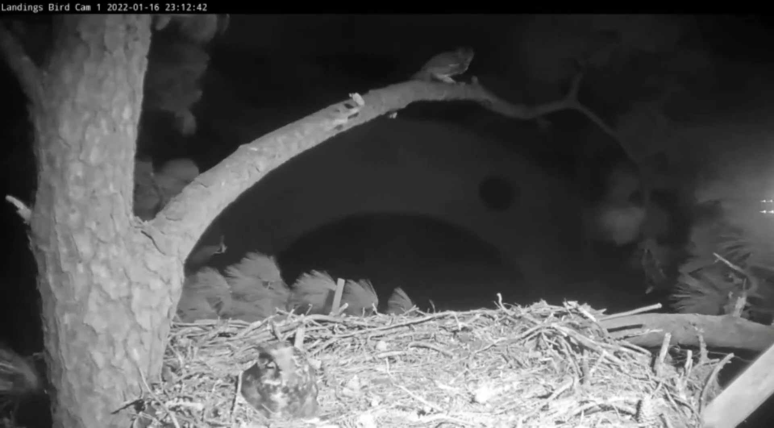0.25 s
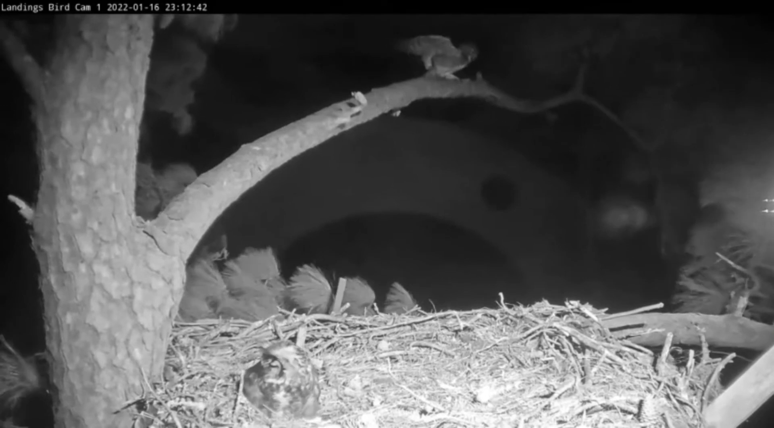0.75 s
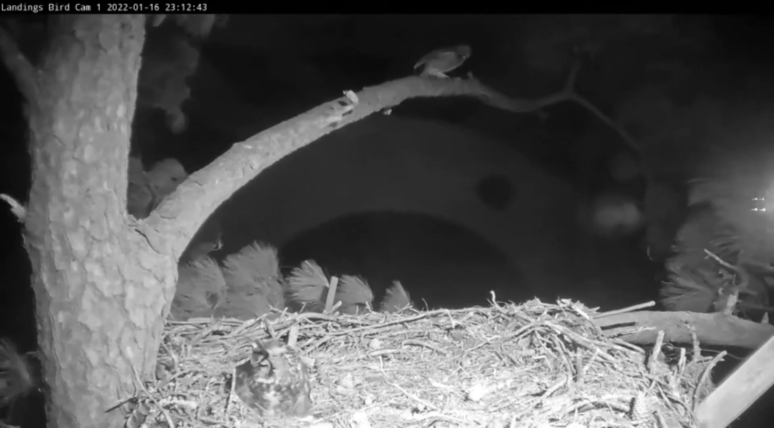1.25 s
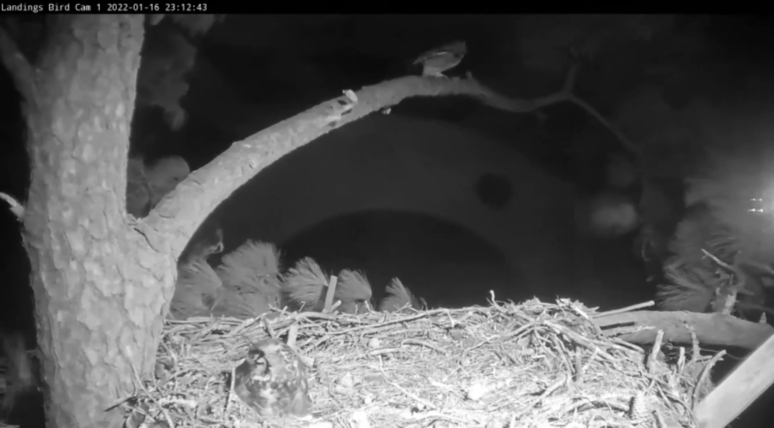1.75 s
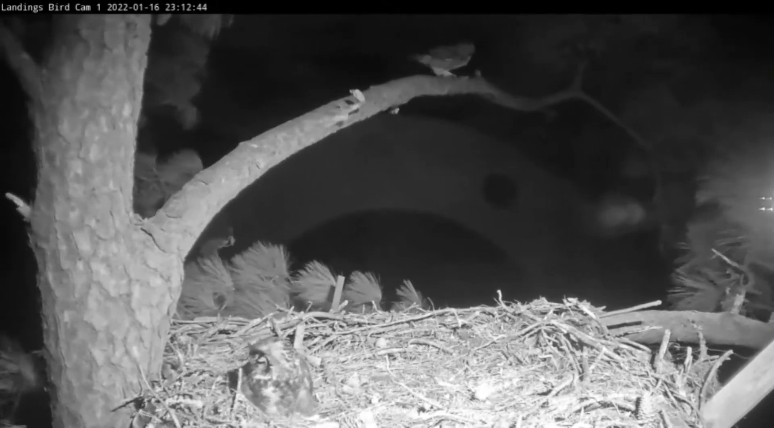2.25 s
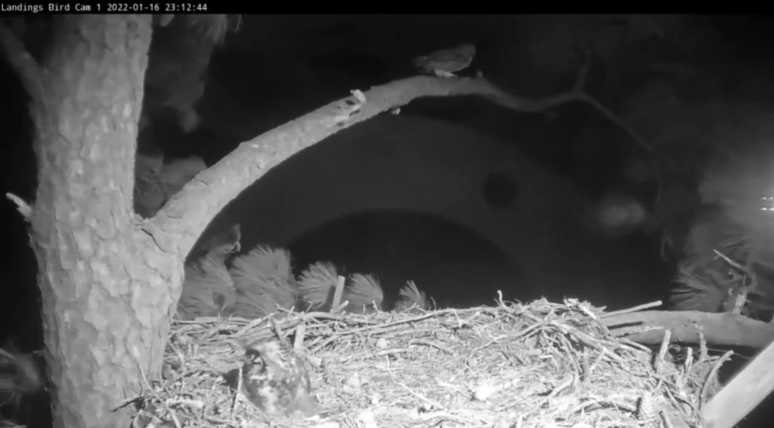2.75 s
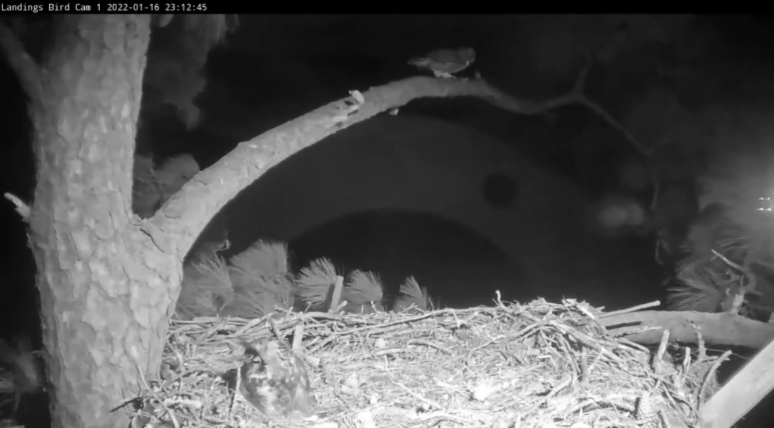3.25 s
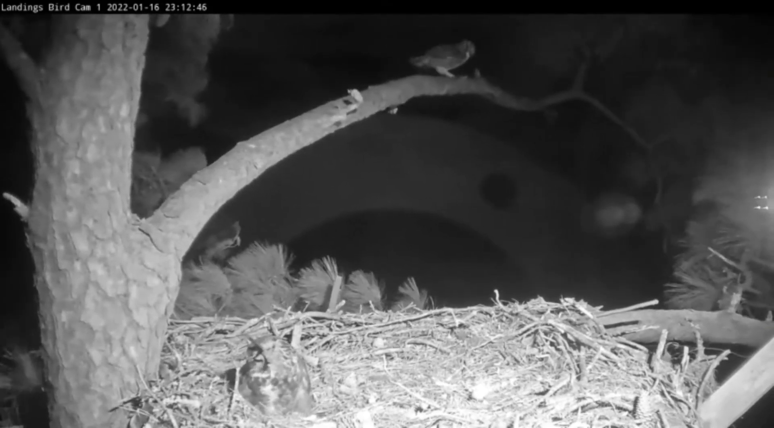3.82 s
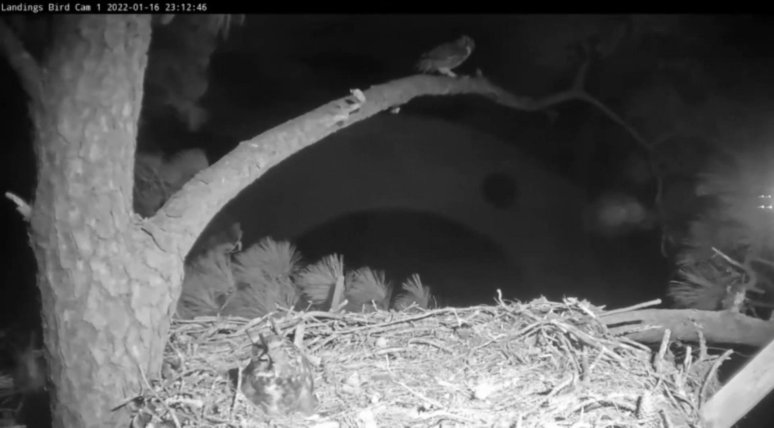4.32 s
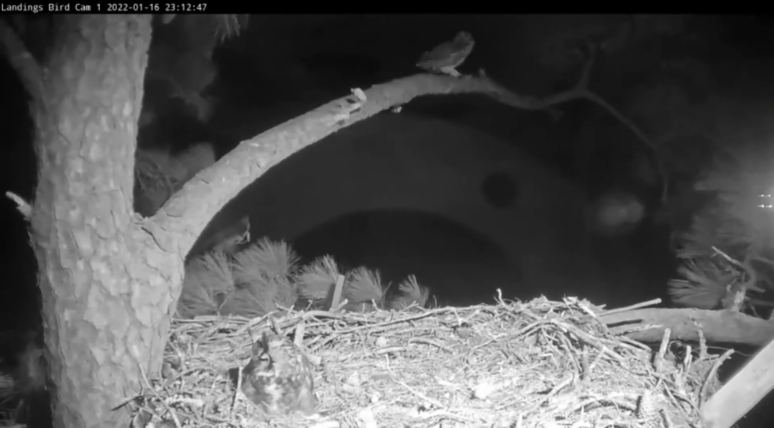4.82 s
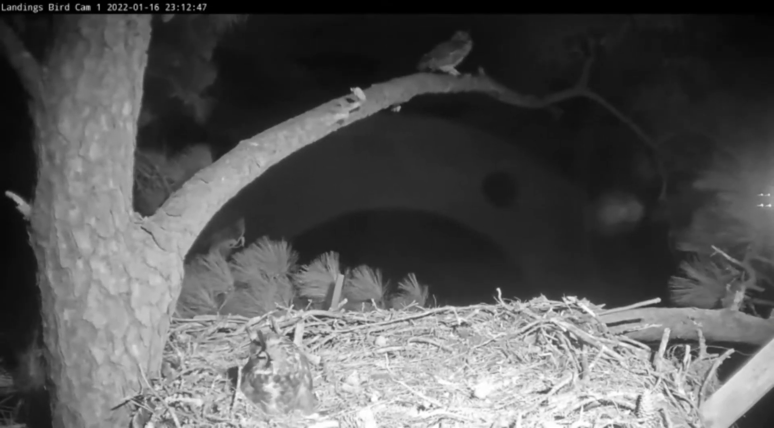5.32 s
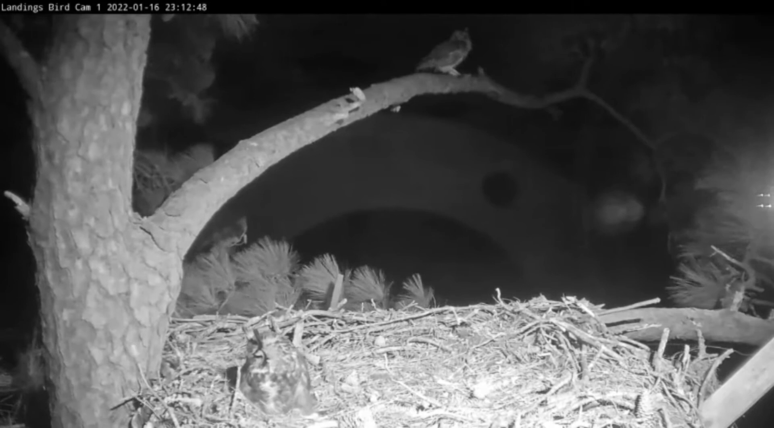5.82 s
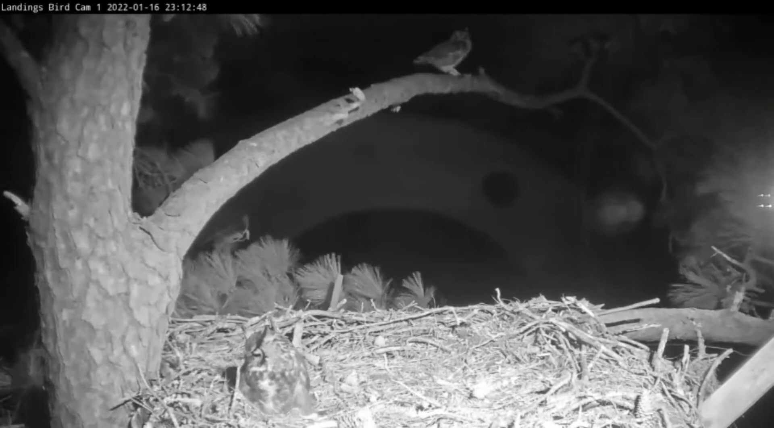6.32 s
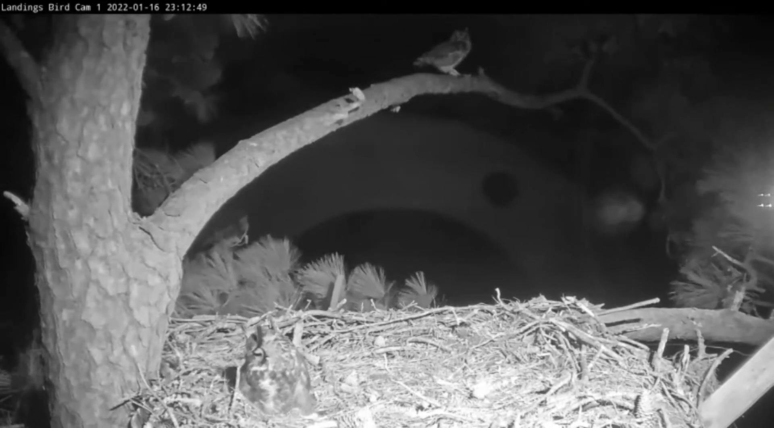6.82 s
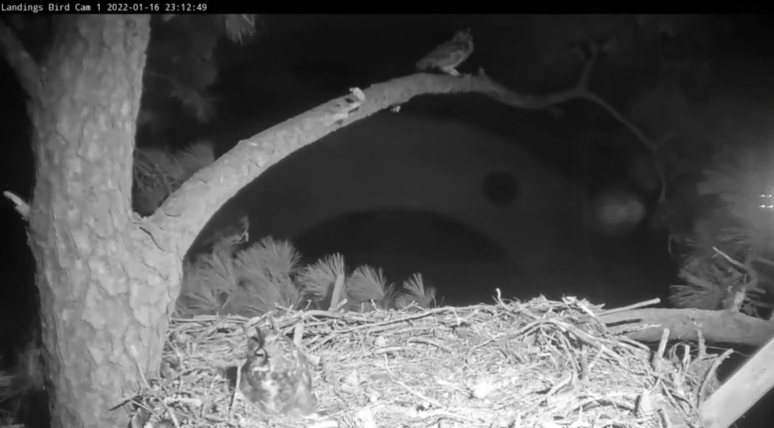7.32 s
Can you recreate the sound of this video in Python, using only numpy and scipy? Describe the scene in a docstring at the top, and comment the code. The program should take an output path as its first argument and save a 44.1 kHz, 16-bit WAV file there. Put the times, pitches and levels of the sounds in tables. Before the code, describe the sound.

Outdoors at night by a large nest in a pine, wind presses on a small housed microphone. Deep rumble and soft flutter rise and fall in uneven lumps over a hissing rush of needles and a hollow roar. The rush dips suddenly with many lumps, then creeps back. Tiny puffs, a thin steady whine and a weak mains hum lie beneath. The rumble eases near six and a half seconds. No bird is heard.

```python
"""Low rumble and flutter of wind on a small housed microphone, over air rushing through pine needles.
The rumbles are shaped noise with limited swings; the rush is hiss plus a roar coloured by the cavity.
Most lumps of wind make the rush fall at once and creep back, while the flutter swells and slackens.
A thin whine and a weak mains hum are sine tones over faint amplifier noise.
Brief random flecks of noise dot the wind, a few clear puffs among them."""
import sys
import numpy as np
from scipy import signal
from scipy.fft import rfft, irfft, next_fast_len
from scipy.io import wavfile
from scipy.ndimage import uniform_filter1d, map_coordinates

SR = 44100
rng = np.random.default_rng(int(sys.argv[2]) if len(sys.argv) > 2 else 0)


def output_pcm(signal):
    """Save a mono or channel-first signal as 16-bit PCM at the path in sys.argv[1].

    Samples are clipped to [-1, 1] before scaling.
    """
    pcm = np.clip(np.atleast_2d(signal).T, -1, 1) * 32767
    wavfile.write(sys.argv[1], SR, np.round(pcm).astype(np.int16))


N = 333837  # length [samples]


def amp(db):
    """Gain of a level in dB."""
    return 10 ** (np.asarray(db) / 20)


def unit(x):
    """x at rms 1."""
    return x / np.sqrt(np.mean(x ** 2) + 1e-20)


def curves(rows):
    """One value per sample for each column after the time."""
    times, *columns = np.transpose(rows)
    return [np.interp(np.arange(N) / SR, times, column) for column in columns]


def wobble(rate):
    """A smooth random curve, rate knots a second."""
    knots = rng.standard_normal(int(N * rate / SR) + 4)
    return map_coordinates(knots, [np.arange(N) * rate / SR])


def filtered(x, response):
    """x times a response of frequency."""
    m = next_fast_len(N + 8192)
    spectrum = rfft(x, m) * response(np.fft.rfftfreq(m, 1 / SR))
    return irfft(spectrum, m)[..., :N]


def shaped_noise(spectrum, patchy_db):
    """Noise of rms 1 with this spectrum and random patches of gain in time and frequency."""
    cells = signal.stft(rng.standard_normal(N), nperseg=512)[2]
    patches = uniform_filter1d(rng.standard_normal(cells.shape), size=6, axis=0)
    patches = uniform_filter1d(patches, size=8, axis=1)
    noise = signal.istft(cells * amp(patchy_db * unit(patches)), nperseg=512)[1][:N]
    table_hz, table_db = np.transpose(spectrum)
    log_hz = np.log(table_hz + 1)
    return unit(filtered(noise, lambda hz: amp(np.interp(np.log(hz + 1), log_hz, table_db))))


def even_swings(push):
    """The diaphragm's travel is limited, so its swings are even in size."""
    return unit(push / (1 + (push / 3.2) ** 2) ** .5)


# Wind on the microphone: (time [s], deep rumble level [dB], upper rumble level [dB])
BUFFET = [(0, -31.5, -39), (.1, -33, -42), (.44, -43, -36.5), (1.05, -42.5, -36.5), (1.16, -34.5, -40),
          (1.72, -38, -38), (1.85, -31, -36.5), (2.02, -37.5, -42), (2.55, -37, -40), (2.78, -41.5, -40.5),
          (3.12, -37.5, -34), (3.39, -32.5, -35.5), (3.54, -36.5, -42.5), (3.69, -43.5, -40.5),
          (4.17, -36, -33), (4.32, -39.5, -37), (4.83, -42, -31.5), (4.98, -33.5, -34), (5.2, -41, -37.5),
          (5.44, -36.5, -38), (5.9, -36, -38.5), (5.97, -42.5, -46), (6.4, -51.5, -42), (6.89, -48, -44.5),
          (7.23, -38, -39), (7.57, -37.5, -36.5)]
# Spectrum of the slow eddies: (frequency [Hz], relative density [dB per Hz])
DEEP_SPECTRUM = [(20, -37.5), (33, -27.5), (45, -11), (57, -3.5), (80, 3), (105, -0.5), (130, -19.5),
                 (240, -120)]
# Spectrum of the quicker eddies: (frequency [Hz], relative density [dB per Hz])
RUMBLE_SPECTRUM = [(56, -33.5), (95, 1), (129, 4), (194, -8), (230, -16.5), (300, -43), (510, -120)]
# Spectrum of the flutter: (frequency [Hz], relative density [dB per Hz])
FLUTTER_SPECTRUM = [(110, -31), (190, -5), (270, 0), (330, -7), (450, -13.5), (700, -22), (1650, -120)]
LUMPY_DB = 0.23  # scale of the rumble's random swings
USUAL_DB = -37  # usual upper rumble
FLUTTER_DB = -45.5  # level before fall, swell and wind strength are added
FLUTTER_FALLS = 0.53  # dB for each dB that the rush is down
FLUTTER_FOLLOWS = 0.25  # dB for each dB that the upper rumble is over its usual level


def buffet(eddies, fall_db, swell_db):
    """Eddies push the diaphragm: slow ones rumble deep, quicker ones rumble higher and flutter."""
    deep_db, rumble_db = curves(BUFFET)
    deep = amp(LUMPY_DB * wobble(8)) * even_swings(shaped_noise(DEEP_SPECTRUM, patchy_db=-1.6))
    rumble = amp(LUMPY_DB * wobble(8)) * even_swings(shaped_noise(RUMBLE_SPECTRUM, patchy_db=0.64))
    flicker = amp(1.2 * wobble(30) + 1.2 * eddies)
    flutter = unit(flicker * shaped_noise(FLUTTER_SPECTRUM, patchy_db=1.1))
    flutter_db = FLUTTER_DB - FLUTTER_FALLS * fall_db + swell_db
    flutter_db = flutter_db + FLUTTER_FOLLOWS * (rumble_db - USUAL_DB)
    return amp(deep_db) * unit(deep) + amp(rumble_db) * unit(rumble) + amp(flutter_db) * flutter


# Spectrum of the rush as heard, with a steep roll-off above 7 kHz:
# (frequency [Hz], relative density [dB per Hz])
HISS_SPECTRUM = [(680, -29.5), (1150, -1.5), (1300, -4), (2030, -6), (2230, -2), (2610, -5), (2900, -1),
                 (3180, -0.5), (4200, -7), (5280, -9.5), (6690, -19.5), (7070, -25), (7650, -42.5),
                 (8200, -45.5), (9500, -54), (16700, -76.5)]
# Spectrum coloured by the cavity of the housing: (frequency [Hz], relative density [dB per Hz])
ROAR_SPECTRUM = [(150, -51), (300, -17), (500, -13.5), (700, -11.5), (850, -6), (960, -2.5), (1040, 1.5),
                 (1090, -3.5), (1160, -12.5), (1300, -19), (2000, -19), (3000, -38.5), (5000, -120)]
RUSH_DB, ROAR_DB = -38, -40  # levels before fall and swell are added
ROAR_FALLS = 0.63  # dB for each dB that the rush is down
ROAR_SWELLS = 0.33  # dB for each dB that the flutter is up


def needles(eddies, fall_db, swell_db):
    """The rush flickers with the eddies and dulls when weak; the cavity roar falls less and follows the swell."""
    hiss_db = RUSH_DB - fall_db
    hiss = unit(amp(0.88 * eddies) * shaped_noise(HISS_SPECTRUM, patchy_db=0.25))
    bright = filtered(hiss, lambda hz: hz ** 2 / (hz ** 2 + 32000.0 ** 2))
    dull = np.clip((-52.0 - hiss_db) / 25, 0, .9)  # share of the bright part taken away
    roar = unit(amp(1.3 * eddies) * shaped_noise(ROAR_SPECTRUM, patchy_db=0.43))
    roar_db = ROAR_DB - ROAR_FALLS * fall_db + ROAR_SWELLS * swell_db
    return amp(hiss_db) * (hiss - dull * bright) + amp(roar_db) * roar


# Whine against the rush, before its random wobble: (time [s], level over the rush [dB])
WHINE = [(0, -17.5), (3.5, -15), (5.3, -14.5), (6.1, -11), (6.7, -13.5), (7.57, -19)]
# Spectrum of the amplifier noise: (frequency [Hz], relative density [dB per Hz])
AMPLIFIER_SPECTRUM = [(6000, -2), (10000, 1), (16000, 0)]
WHINE_HZ, HUM_HZ = 2842.5, 60
HUM_DB, SELF_NOISE_DB = -50, -93  # rms levels


def electronics(fall_db):
    """A whine that falls with the rush, the mains hum and the faint noise of the amplifier."""
    t = np.arange(N) / SR
    whine_db = RUSH_DB - fall_db + curves(WHINE)[0] + 0.92 * wobble(2.6)
    whine = amp(whine_db) * np.sin(2 * np.pi * WHINE_HZ * t)
    hum = amp(HUM_DB) * np.sin(2 * np.pi * HUM_HZ * t)
    tones = np.sqrt(2) * (whine + hum)  # a sine of rms 1 peaks at sqrt(2)
    return tones + amp(SELF_NOISE_DB) * shaped_noise(AMPLIFIER_SPECTRUM, patchy_db=2.0)


# Brief random flecks of noise in the wind, a few clear puffs among them,
# all turned down alike when played: (time [s], relative level [dB])
FLECKS = [(0.6194, -48), (1.0394, -39), (1.578, -34), (1.8594, -38), (2.64, -38), (2.681, -34.5),
          (2.83, -40), (3.035, -37), (3.339, -34), (3.7234, -44), (3.95, -35.5), (4.038, -38),
          (4.2484, -40), (4.31, -37), (5.4206, -40), (5.5796, -38), (5.728, -36), (5.785, -45),
          (5.836, -36), (5.878, -35.5), (5.91, -41), (5.951, -36), (6.008, -40)]
FLECK_RISE_S = 0.0032  # time from onset to peak


def flecks():
    """Each fleck is a brief touch of hiss and roar noise that swells in milliseconds and dies."""
    size = np.zeros(N + SR)
    u = np.arange(SR // 20) / SR / FLECK_RISE_S
    for onset, db in FLECKS:
        size[round(onset * SR):][:len(u)] += amp(db - 12) * u * np.exp(1 - u)
    noise = shaped_noise(HISS_SPECTRUM, patchy_db=-3.7) + 1.8 * shaped_noise(ROAR_SPECTRUM, patchy_db=3.0)
    return size[:N] * noise


# Lumps of wind; negative values act the other way:
# (time [s], fall of the rush before smoothing and floor [dB], swell of the flutter [dB])
LUMPS = [(0.635, 3, 3.5), (1.134, 6.5, -1), (1.362, 2, 5), (1.605, 5, 3.5), (1.895, 6.5, 5), (2.38, 3, 0.5),
         (2.851, 10, 3), (3.147, 5.5, 6.5), (3.379, 7, 4), (3.508, 6, 3.5), (4.046, 5, 2.5),
         (4.18, 5.5, 5.5), (4.487, 4, 11.5), (4.826, 4, 1), (4.991, 6.5, 10.5), (5.09, 3, -3),
         (5.221, 5.5, 5.5), (5.471, 1, 9), (5.65, 0.5, 4.5), (5.741, 6.5, 1.5), (5.85, 2, 1.2),
         (5.92, 1.5, 1), (5.965, -5.5, -5.3), (6.814, 6, -0.7), (7.016, 0.5, -0.2), (7.252, 2.5, -0.3),
         (7.504, 2.5, 0)]
FIRST_FALL_DB, LEAST_FALL_DB = 11.5, 4.5  # fall at the start, before the floor; floor where the rush levels off
CREEP_S, FALL_S = 0.79, .008  # time constants of creeping back (in usual wind) and of a fall
CALM_QUICKENS = 0.47  # dB of creep speed gained for each dB of upper rumble below usual
SWELL_S, SLACK_S = 0.2, 0.059  # time constants of the swell into a lump and its slackening after


def lumps():
    """How far the rush is down and the flutter up, in dB, summed over the lumps of wind."""
    t = np.arange(N) / SR
    creep_speed = amp(CALM_QUICKENS * (USUAL_DB - curves(BUFFET)[1]))
    crept = np.cumsum(creep_speed) / SR / CREEP_S  # progress in time constants
    fall_db = FIRST_FALL_DB * np.exp(-crept)
    swell_db = np.zeros(N)
    for onset, fall, swell in LUMPS:
        after = t >= onset
        distance = np.abs(t - onset)
        creeping_back = np.exp(-np.abs(crept - np.interp(onset, t, crept)))
        fall_db = fall_db + fall * after * (creeping_back - np.exp(-distance / FALL_S))
        swell_db = swell_db + swell * np.exp(-distance / np.where(after, SLACK_S, SWELL_S))
    return np.hypot(fall_db, LEAST_FALL_DB), swell_db


def scene():
    """Quick eddies and lumps of wind drive buffet and needles; the whine follows the fall, flecks stand alone."""
    eddies = 0.1 * wobble(49) + 0.96 * wobble(90)
    fall_db, swell_db = lumps()
    wind = buffet(eddies, fall_db, swell_db) + needles(eddies, fall_db, swell_db)
    return (wind + flecks() + electronics(fall_db))[None]


TOP_HZ = 15700  # band limit


def record(dry):
    """Nothing is kept from the band limit up."""
    return filtered(dry, lambda hz: hz < TOP_HZ)


dry = scene()
out = record(dry)
output_pcm(out)
```